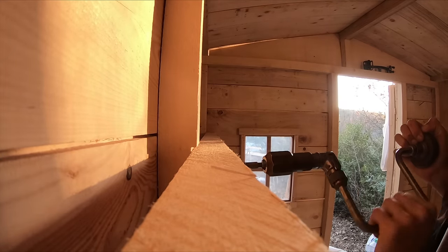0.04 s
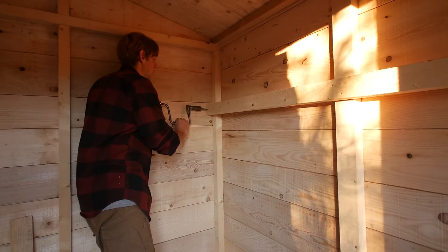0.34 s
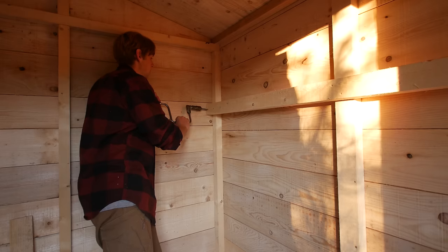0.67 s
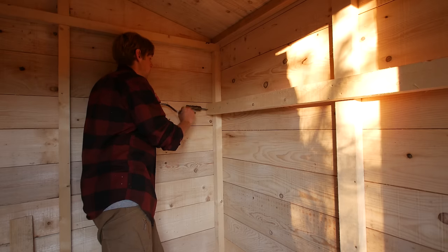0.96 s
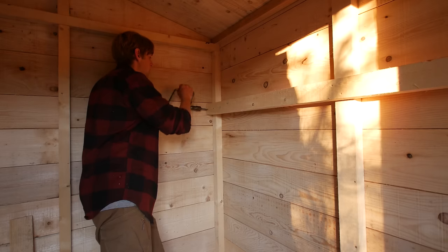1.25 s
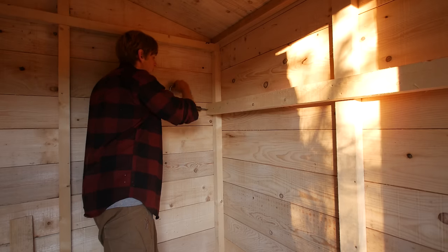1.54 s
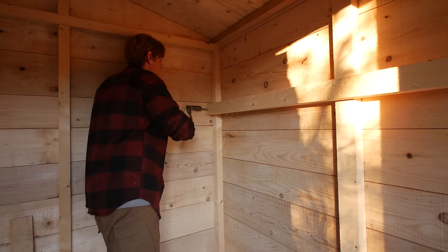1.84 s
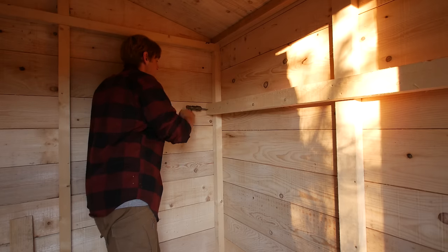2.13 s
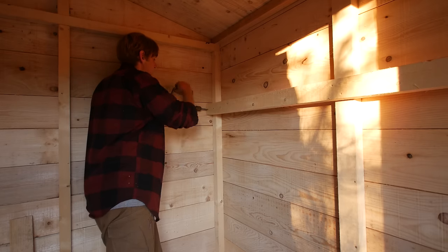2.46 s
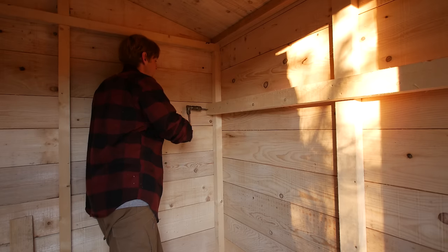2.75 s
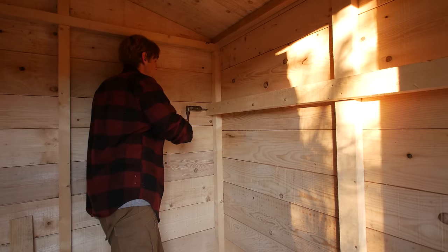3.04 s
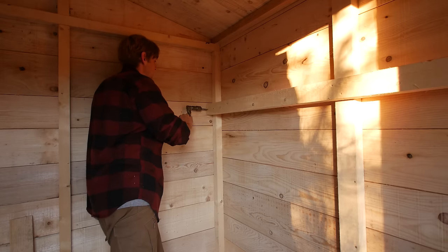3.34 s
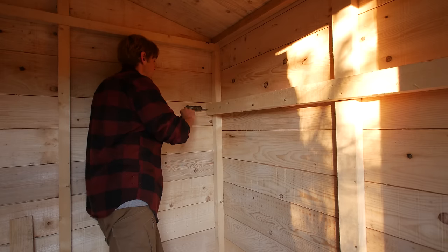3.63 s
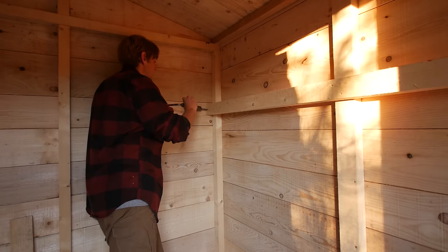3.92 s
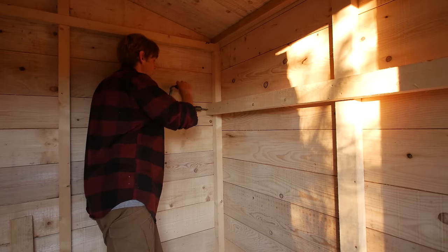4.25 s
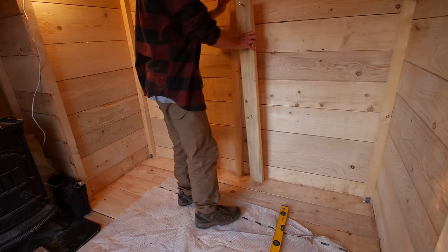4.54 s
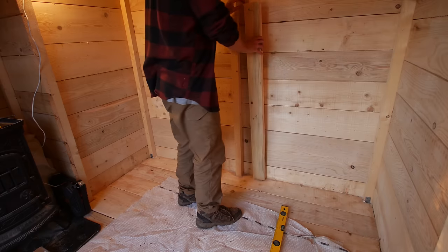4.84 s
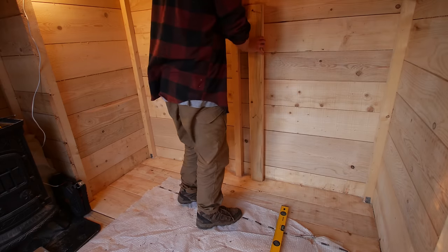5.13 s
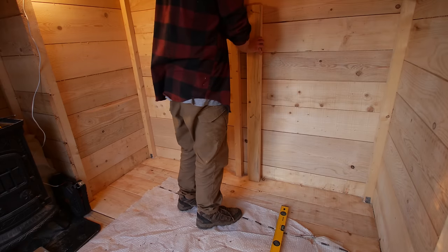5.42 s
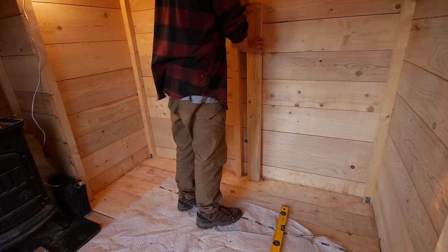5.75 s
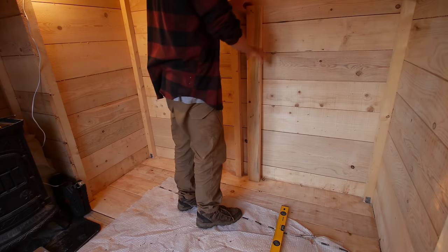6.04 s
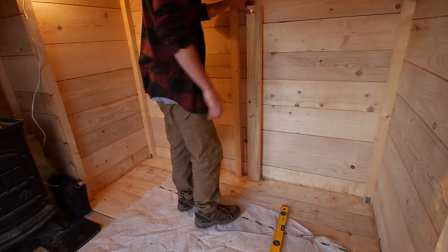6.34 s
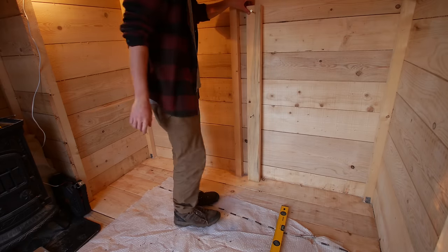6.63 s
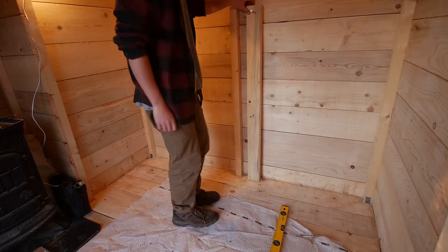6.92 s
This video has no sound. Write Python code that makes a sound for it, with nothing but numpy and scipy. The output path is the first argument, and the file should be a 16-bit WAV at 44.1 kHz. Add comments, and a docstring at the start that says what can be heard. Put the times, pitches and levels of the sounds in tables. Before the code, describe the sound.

Inside a small wooden cabin, heard close over a faint hiss, a beam gives a soft, low groan for the first 0.4 seconds as a hand brace draws into pine. The bit bites with three sharp snaps at about 1.0, 1.2 and 1.4 seconds. From 1.5 to 3 seconds the boards grumble under the load while the crank ticks and gives tiny squeaks, with another snap at 2.4 and a dull knock at 2.9. After a quieter moment, two more snaps come at 3.9 and 4.1 seconds. Around 4.5 seconds a shoe and sleeve scuff the timber. A loose upright is then bumped into place with several dull thumps, the loudest at about 4.9 and 5.4 seconds. Faint creaking follows, then a few light rubs and ticks from 6.5 to 7 seconds. Every blow rings briefly in the boards.

```python
"""Inside a small wooden cabin, close to a hand brace boring into pine. First the beam groans as
the screw tip draws in; the background is duller here, then abruptly brightens. The bit bites with six
sharp snaps, while the crank ticks and squeaks and the wall grumbles and knocks under the load. Then
shoe and sleeve scuff the timber and a loose upright is bumped into place with dull thumps. A few
light rubs and ticks come last. Every blow rings briefly in the boards."""
import sys
import numpy as np
from scipy import signal
from scipy.fft import rfft, irfft, next_fast_len
from scipy.io import wavfile
from scipy.ndimage import uniform_filter1d

SR = 44100
rng = np.random.default_rng(int(sys.argv[2]) if len(sys.argv) > 2 else 0)


def waveform_to_disk(signal):
    """Save audio, clipped to [-1, 1], as 16-bit WAV at the path in sys.argv[1]."""
    frames = np.transpose(np.atleast_2d(signal))
    scaled = np.clip(frames, -1, 1) * 32767
    samples = np.round(scaled).astype(np.int16)
    wavfile.write(sys.argv[1], SR, samples)


N = 307818
T = np.arange(int(SR * .7)) / SR  # time within one blow and its ring, s
GROAN_END_S = .37


def snaps(fracture_db=7.5, give_db=-9, ring_db=-9, boom_rise_s=0.023):
    """Fibres give a little under the bit, then break; the wall takes the jolt and booms just after."""
    # each break: t/s, relative level/dB, low resonance f/Hz, its lift/dB, high resonance f/Hz,
    # its lift/dB, steel ring/dB, crispness/dB, wall boom/dB
    breaks = [(0.9973, -20.5, 1320, 11, 2680, 7.5, 4.5, -1, -32.5),
              (1.185, -20, 1160, 9, 2940, 10.5, 0, -2, -35), (1.3734, -23, 1300, 9, 2970, 6, -3, -4, -40.5),
              (2.3663, -23, 1114, 10.5, 2766, 0, 3, -13.5, -36),
              (3.9243, -23, 1580, 10.5, 2830, 8.5, 7, -3, -32.5),
              (4.1399, -23, 1395, 5.5, 2800, 7.5, 0.5, -3.5, -37)]
    # spectrum of breaking pine: f/Hz, level/dB
    pine_spectrum = [(200, -29.5), (480, -11.5), (750, -7), (1000, -7), (2100, -2), (3500, 1), (5600, 1.5),
                     (6800, -2.5), (8400, 3), (9600, 1.5), (11200, 5), (15500, 3)]
    # spectrum of the jolted wall: f/Hz, level/dB
    wall_spectrum = [(60, -38.5), (130, -15.5), (220, -6.5), (320, 5), (450, -5.5), (600, -15.5),
                     (1000, -42.5), (3000, -66.5)]
    out, hz = np.zeros(N), bins(T)
    direct_eq = curve([(1000, 3), (4000, 7), (9000, 9)], hz)
    echo_eq = curve([(1500, -8), (5000, -9.5), (14000, -12)], hz)  # bare boards soak up some treble
    for s, db, low_hz, low_db, high_hz, high_db, steel_db, crisp_db, boom_db in breaks:
        shape = curve(pine_spectrum, hz) + 2 * crisp_db * hz / (hz + 4000)
        shape += low_db * hump(hz, low_hz, .18) + high_db * hump(hz, high_hz, .2)
        shape += steel_db * hump(hz, 5450, .12)
        fracture = colour(crack(peak_s=.0011, room_db=-45, uneven_db=2), shape + direct_eq)
        echo = colour(cabin(rise_s=.002), shape + echo_eq)
        ring = amp(steel_db) * brace_ring() + amp(ring_db) * timber_ring(shape, hz)
        add(out, s, amp(db) * (amp(fracture_db) * fracture + echo + ring))
        give = colour(crack(peak_s=.0007, room_db=-25, uneven_db=3), shape - hz / 600)
        add(out, s - .0013, amp(db + give_db) * give)
        add(out, s, amp(boom_db) * colour(cabin(boom_rise_s), curve(wall_spectrum, hz)))
    return out


def brace_ring():
    """The steel brace rings, thin and quickly damped, as the bit jerks free."""
    # modes of the brace: f/Hz, level/dB, t60/s
    modes = [(5740, -28.5, .2), (5740, -27.5, .2), (8400, -30, 0.17), (11200, -26, .18),
             (13300, -28.5, .16)]
    hz, db, t60 = np.transpose(modes)[:, :, None]
    return (amp(db) * np.sin(2 * np.pi * (hz * T + rng.random(hz.shape))) * decay(t60)).sum(0)


def timber_ring(shape, hz):
    """Each mode of the bored board rings as strongly as the blow is at its pitch."""
    # modes of the board: f/Hz, level/dB
    modes = [(781, -3.5), (1020, -9.5), (1294, -2), (1435, -1), (1545, -9.5), (1821, -5.5), (2066, -1.5),
             (2266, 2), (2653, -10), (2768, -9), (2970, -7.5), (3310, -2), (3880, -2), (5200, -0.5),
             (5690, 2)]
    mode_hz, mode_db = np.transpose(modes)[:, :, None]
    half = len(hz) // 2
    blow_db = np.interp(mode_hz, hz[:half], shape[:half])
    blow_db += rng.uniform(-2, 2, mode_hz.shape)  # the spot struck varies
    phase = 2 * np.pi * rng.random(mode_hz.shape)
    strength = amp(mode_db + blow_db)
    t60 = .29 * (1300 / mode_hz) ** .55  # pine damps its high modes sooner
    partials = strength * np.sin(2 * np.pi * mode_hz * T + phase) * decay(t60)
    return partials.sum(0) / np.linalg.norm(strength) * (1 - np.exp(-T / 0.00085))


def thumps(wash_db=-9):
    """A soft blow rings the low modes of wall and floor; a harder one reaches higher and clicks."""
    # each blow: t/s, level/dB, upper corner f/Hz (hardness), lower corner f/Hz (spot struck),
    # contact click/dB, factor on the ring time
    blows = [(1.307, -32.5, 152, 92.3, -58, 0.9), (1.482, -41, 150, 88.7, -73, 0.34),
             (2.075, -44, 465, 131.4, -60, .7), (2.877, -21.5, 690, 133.6, -55, 0.55),
             (2.938, -35, 250, 130, -70.5, 0.33), (4.652, -35, 186, 70, -75.5, 0.67),
             (4.867, -32.5, 106, 50, -51.5, 1), (4.939, -13.5, 390, 50, -32.5, 0.9),
             (5.112, -18.5, 243, 50, -46, 0.95), (5.322, -35.5, 190, 50, -58, 1),
             (5.426, -9.5, 420, 50.2, -36.5, 0.8), (5.483, -23, 495, 91.6, -50.5, 0.61),
             (6.786, -49.5, 109, 60, -74, 1)]
    # modes of the wall and floor boards: f/Hz, level/dB, t60/s
    modes = [(88.56, -3.5, 0.11), (100.7, -1.5, 0.16), (130, -14, 0.45), (192, -2, 0.31),
             (236.2, -12.5, .2), (262.8, -7, 0.38), (296, -18, 0.22), (315, -9.5, 0.22),
             (375.3, -1.5, 0.18), (431, -10, 0.42), (452, -13, 0.31), (493, -15, 0.46), (588, -23, 0.39),
             (693, -13.5, 0.33), (684, -37, .2), (766, -28.5, 0.061), (830, -22, 0.077)]
    # spectrum of the diffuse thud around the modes: f/Hz, level/dB
    thud_spectrum = [(25, -58), (55, -34), (90, 0), (200, 9.5), (400, -1.5), (600, -4), (1000, -20),
                     (2500, -43.5), (8000, -54.5)]
    click_spectrum = [(200, -3.5), (700, 5.5), (1600, -1.5), (4000, -6.5), (7000, -27.5), (15000, -35.5)]
    out, hz = np.zeros(N), bins(T)
    mode_hz, mode_db, t60 = np.transpose(modes)[:, :, None]
    sign = (-1) ** np.arange(len(modes))[:, None]  # neighbouring modes swing against each other
    for s, db, upper_hz, lower_hz, click_db, sustain in blows:
        strength = amp(mode_db) / np.sqrt(1 + (mode_hz / upper_hz) ** 4 + (lower_hz / mode_hz) ** 6)
        partials = sign * strength * np.sin(2 * np.pi * mode_hz * T) * decay(t60 * sustain)
        ring = partials.sum(0) / np.linalg.norm(strength)
        rolloff_db = 10 * np.log10(1 + (hz / upper_hz) ** 4 + (lower_hz / (hz + 20)) ** 4)
        echoes = cabin(rise_s=0.0026) * np.exp(-T / (0.2 * sustain))
        wash = colour(echoes, curve(thud_spectrum, hz) - rolloff_db)
        click = colour(crack(peak_s=0.0014, room_db=-1.5, uneven_db=-2), curve(click_spectrum, hz))
        add(out, s, amp(db) * (ring + amp(wash_db) * wash) + amp(click_db) * click)
    return out


def ticks(gain_db=3, ring_db=-8):
    """Light knocks of crank, timber and sleeve, with the board and the room ringing behind them."""
    # each knock: t/s, relative level/dB, brightness/dB (woody below -10, metallic above 0)
    knocks = [(0.388, -56, -5.5), (0.91, -47.5, -8), (0.989, -44, -21), (1.091, -43.5, -19),
              (1.536, -55.5, 6), (1.732, -45, -16), (1.757, -43.5, -6), (1.782, -50.5, 2),
              (1.822, -45.5, -16), (1.895, -47.5, -23), (1.905, -39.5, -17.5), (2.148, -50.5, -7),
              (2.166, -49, 9), (2.616, -47.5, -23), (2.637, -45, -13.5), (2.778, -38, -18),
              (3.024, -49.5, -12.5), (3.114, -50, 12), (3.434, -56.5, -27.5), (3.54, -60.5, -35),
              (4.785, -50, 10), (4.814, -53, 21), (5.666, -59.5, -5), (6.054, -61, -30.5),
              (6.541, -47.5, 16), (6.974, -44.5, 9)]
    # spectrum of a knock: f/Hz, level/dB
    spectrum = [(80, -32.5), (200, -9), (330, -1), (550, 5), (780, -1), (1050, -1), (1450, 3.5),
                (2000, -2.5), (3000, 6), (4000, 10), (5500, -9.5), (8000, -14), (15000, -25.5)]
    out, hz = np.zeros(N), bins(T)
    for s, db, bright_db in knocks:
        shape = curve(spectrum, hz) + curve([(1800, 0.0015), (3800, bright_db)], hz)
        contact = colour(crack(peak_s=0.0014, room_db=-6.5, uneven_db=0.5), shape)
        add(out, s, amp(db + gain_db) * (contact + amp(ring_db) * timber_ring(shape, hz)))
    return out


def rubs(swish_db=-2.5, grit_db=3.5):
    """Cloth, hand and shoe swish along the timber; the harder the stroke, the more grit crackles."""
    # each stroke: t/s, rise/s, hold/s, relative level/dB
    scuffs = [(1.15, 0.015, .005, -49.5), (1.302, 0.0053, 0.037, -42), (1.98, 0.014, 0.058, -66),
              (2.26, .012, .015, -62), (2.5, 0.0082, 0.0089, -66.5), (2.71, 0.0087, 0.013, -60),
              (2.91, 0.021, 0.021, -55), (4.402, 0.0046, .02, -60.5), (4.464, .012, 0.086, -36),
              (4.535, 0.056, 0.032, -31), (4.7, 0.038, .15, -58), (5.16, 0.067, 0.0083, -49),
              (5.26, .065, 0.011, -46.5), (5.66, .01, .02, -68), (5.9, 0.021, 0.017, -60),
              (6.225, 0.0062, 0.03, -62), (6.3, .02, 0.029, -60), (6.506, 0.0033, 0.034, -46.5),
              (6.695, 0.026, 0.028, -49.5), (6.745, .025, .01, -42.5), (6.85, 0.0057, .01, -50),
              (6.9, 0.048, .04, -52)]
    # spectrum of the swish: f/Hz, level/dB
    swish_spectrum = [(200, -22.5), (450, -8.5), (850, -18), (1300, -6), (2400, -1), (3700, 5), (4500, -3),
                      (5500, -8.5), (8000, -15), (13000, -28.5), (16000, -26.5)]
    # spectrum of the grit: f/Hz, level/dB
    grit_spectrum = [(1000, -25.5), (3500, -6.5), (6000, 1.5), (9000, 1), (13000, -4), (16000, -6)]
    force = strokes(scuffs, release_db_per_s=239.5)
    swish = friction(force, swish_spectrum, slips_per_s=4000, spread_db=2.5, room_db=-8)
    grit = friction(force ** 1.48, grit_spectrum, slips_per_s=1900, spread_db=3.5, room_db=-3.5)
    return amp(swish_db) * swish + amp(grit_db) * grit


def loaded_boards(grumble_db=-6, crunch_db=-34):
    """The boards grumble under each load, and fibres crunch at the cutter or in the joints."""
    # each push on the crank or shift of weight: t/s, rise/s, hold/s, relative level/dB
    pushes = [(.37, 0.014, 0.045, -52), (.91, 0.011, .03, -54), (1.65, 0.13, 0.061, -38),
              (1.89, 0.025, 0.021, -39), (2.07, .02, 0.097, -44.5), (2.31, 0.021, .08, -45.5),
              (2.49, 0.028, 0.065, -47), (2.61, 0.037, 0.021, -40.5), (2.78, .02, .03, -58),
              (3.02, 0.013, 0.022, -53.5), (3.37, .03, 0.059, -60), (3.54, .02, .02, -62),
              (4.47, 0.095, .05, -46), (5.55, .03, 0.11, -48), (5.79, 0.036, .08, -51.5),
              (6.05, 0.018, 0.029, -54), (6.22, 0.029, 0.059, -60.5), (6.79, 0.041, .12, -54)]
    # spectrum of the grumbling boards: f/Hz, level/dB
    grumble_spectrum = [(25, -46), (60, -23.5), (90, -11), (130, -3), (165, 3), (190, -0.5), (215, -5),
                        (258, 5.5), (320, 0), (380, -7.5), (470, -7.5), (650, -18), (1000, -40),
                        (2000, -70.5)]
    # spectrum of the crunching fibres: f/Hz, level/dB
    crunch_spectrum = [(400, -1.5), (800, -2.5), (1400, 5), (2400, -4), (3900, -12.5), (5500, -11.5),
                       (9000, -24), (15000, -26.5)]
    load = strokes(pushes, release_db_per_s=113.5)
    grumble = friction(load, grumble_spectrum, slips_per_s=450, spread_db=3.5, room_db=-5.5)
    crunch = friction(load ** 0.69, crunch_spectrum, slips_per_s=450, spread_db=4.5, room_db=2.5)
    return amp(grumble_db) * grumble + amp(crunch_db) * crunch


def groan(start_db=-49, fade_db_per_s=25.5):
    """Close by, the beam groans as the screw tip draws itself in with less and less strain."""
    # spectrum of the strained beam: f/Hz, level/dB
    spectrum = [(25, -3), (45, -1.5), (100, -3), (175, -1.5), (198, 9.5), (222, -1.5), (320, 1.5),
                (364, -0.5), (420, -12.5), (700, -29.5), (1500, -49.5)]
    t = np.arange(N) / SR
    force = amp(start_db - fade_db_per_s * t) * np.clip((GROAN_END_S - t) / 0.0084, 0, 1)
    return friction(force, spectrum, slips_per_s=730, spread_db=-1, room_db=-18.5)


def squeaks():
    """The handle sticks on its steel shaft and sings unsteadily for an instant."""
    # each squeak: t/s, length/s, level/dB
    catches = [(1.718, 0.04, -60), (2.612, 0.043, -69), (3.44, .055, -74)]
    # partials of the shaft: f/Hz, level/dB
    partials = [(5520, 1), (9950, -2)]
    out = np.zeros(N)
    for s, length, db in catches:
        count = round(length * SR)
        drift = 1 + .035 * unit_rms(uniform_filter1d(rng.standard_normal(count), size=70))
        tone = sum(amp(part_db) * np.sin(2 * np.pi * hz * np.cumsum(drift) / SR)
                   for hz, part_db in partials)
        add(out, s, amp(db) * tone * np.hanning(count))
    return out


def cabin(rise_s):
    """Echoes build up between the cabin walls, then each band dies at its own speed."""
    # reverberation of the room: f/Hz, t60/s
    reverb_times = [(100, 0.76), (260, 0.37), (700, 0.28), (1400, 0.27), (2500, 0.19), (4850, 0.18),
                    (12800, 0.14)]
    echoes, hz = rfft(scatter(len(T))), np.fft.rfftfreq(len(T), 1 / SR)
    centres, t60s = np.transpose(reverb_times)
    bands = [curve(np.c_[centres, weights], hz) for weights in np.eye(len(centres))]
    tail = sum(irfft(echoes * band, len(T)) * decay(t60) for band, t60 in zip(bands, t60s))
    return tail * (1 - np.exp(-T / rise_s))


def room_tone():
    """Quiet air and a soft hiss near 4 kHz; both sink midway."""
    # course of the background: t/s, air level/dB, hiss level/dB
    levels = [(0, -62.5, -75), (.9, -66.5, -73.5), (1.5, -62.5, -68), (3, -68, -68), (3.6, -73.5, -88.5),
              (4.35, -68, -85.5), (4.8, -66.5, -65), (6.98, -68, -73.5)]
    # spectrum of the air: f/Hz, level/dB
    air_spectrum = [(25, -31), (60, -5.5), (110, -3), (260, -1), (400, -4.5), (630, -11), (950, -18.5),
                    (1450, -12.5), (2400, -19), (3900, -20), (5500, -20.5), (9000, -23), (16000, -25)]
    hiss_spectrum = [(1500, -25.5), (2800, -9), (3600, -2), (4200, -4), (4900, -29.5), (7000, -34),
                     (12000, -42)]
    air, hiss = rng.standard_normal((2, N))
    t, hz = np.arange(N) / SR, bins(air)
    at, air_db, hiss_db = np.transpose(levels)
    air = amp(np.interp(t, at, air_db)) * colour(air, curve(air_spectrum, hz))
    dull = signal.sosfilt(signal.butter(4, 6500, fs=SR, output="sos"), air)
    air = np.where(t < GROAN_END_S, amp(-3) * dull, air)  # duller and quieter at first
    return air + amp(np.interp(t, at, hiss_db)) * colour(hiss, curve(hiss_spectrum, hz))


def crack(peak_s, room_db, uneven_db):
    """A quick run of tiny fractures of uneven size, followed by the room."""
    sizes = unit_rms(amp(uneven_db * np.clip(rng.standard_normal(len(T)), -2, 2)))
    burst = sizes * scatter(len(T)) * (T / peak_s) * np.exp(1 - T / peak_s)
    return burst + amp(room_db) * cabin(rise_s=.002)


def friction(force, spectrum, slips_per_s, spread_db, room_db):
    """Stick-slip: tiny random jerks, coloured by what is rubbed and blurred by the near walls."""
    sizes = amp(spread_db * np.minimum(rng.exponential(1, N), 4))
    slips = sizes * rng.choice([-1., 1.], N) * (rng.random(N) < slips_per_s / SR)
    jerks = unit_rms(slips) * force
    walls = cabin(rise_s=0.00067) * np.exp(-T / .02)
    reflected = signal.fftconvolve(jerks, walls / np.linalg.norm(walls))[:N]
    blend = (jerks + amp(room_db) * reflected) / np.hypot(1, amp(room_db))
    return colour(blend, curve(spectrum, bins(jerks)))


def strokes(rows, release_db_per_s):
    """Force over time: each stroke builds up, holds and lets go."""
    t, power = np.arange(N) / SR, np.zeros(N)
    for start, rise, hold, db in rows:
        release_db = -release_db_per_s * np.clip(t - start - rise - hold, 0, 1)
        power += (np.clip((t - start) / rise, 0, 1) * amp(db + release_db)) ** 2
    return np.sqrt(power)


def scatter(count):
    """Dense impulses of random sign and even strength, one in every four samples."""
    taps = np.zeros(count)
    at = np.arange(0, count - 4, 4)
    taps[at + rng.integers(0, 4, len(at))] = rng.choice([-2., 2.], len(at))
    return taps


def colour(x, db):
    """Causal filter shaped by db at each bin; it keeps the power of white noise."""
    log_gain = np.log(unit_rms(amp(db)) + 1e-6)
    response = np.exp(np.conj(signal.hilbert(log_gain)))  # minimum phase
    return np.fft.ifft(np.fft.fft(x, len(db)) * response).real[:len(x)]


def curve(points, hz):
    """Interpolates a table on a log-frequency axis."""
    f, value = np.transpose(points)
    return np.interp(np.log(hz + 1), np.log(f + 1), value)


def hump(hz, centre_hz, octaves):
    """The bell shape of a resonance, 1 at its centre."""
    return 1 / (1 + (np.log2((hz + 1) / centre_hz) / octaves) ** 2)


def decay(t60):
    """Envelope that falls 60 dB in t60 seconds."""
    return np.exp(-np.log(1000) * T / t60)


def bins(x):
    """Frequencies of the padded spectrum of x."""
    return abs(np.fft.fftfreq(next_fast_len(len(x) + 4096), 1 / SR))


def amp(db):
    """Decibels to gain."""
    return 10 ** (np.asarray(db) / 20)


def unit_rms(x):
    """Scales to an rms of one."""
    return x / np.sqrt(np.mean(x ** 2) + 1e-20)


def add(mix, s, sound):
    """Mixes a sound in at time s."""
    part = mix[max(round(s * SR), 0):][:len(sound)]
    part += sound[:len(part)]


def scene():
    """Tool, timber and clothing as heard in the cabin, in mono."""
    return (snaps() + ticks() + thumps() + squeaks() + groan() + loaded_boards() + rubs()
            + room_tone())[None]


def record(dry, low_cut_hz=62, band_limit_hz=16100):
    """The microphone's bass cut and the recorder's band limit."""
    cut = signal.sosfilt(signal.butter(3, low_cut_hz, "high", fs=SR, output="sos"), dry)
    lowpass = signal.firwin(301, band_limit_hz, window=("kaiser", 9), fs=SR)
    return signal.oaconvolve(cut, lowpass[None], "same")


dry = scene()
out = record(dry)
waveform_to_disk(out)
```